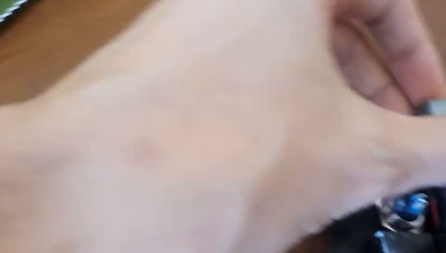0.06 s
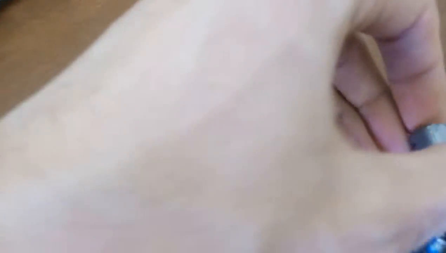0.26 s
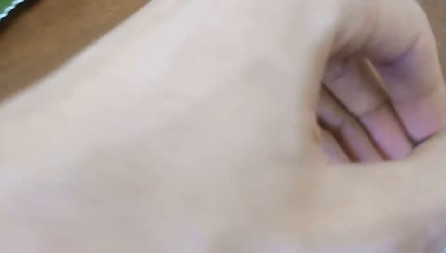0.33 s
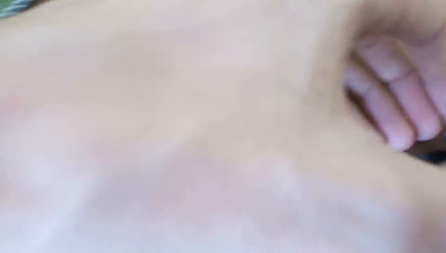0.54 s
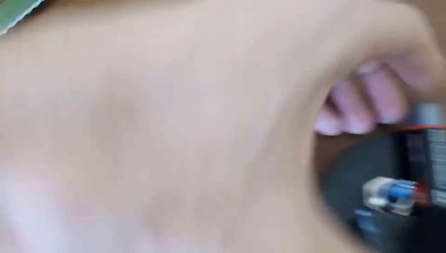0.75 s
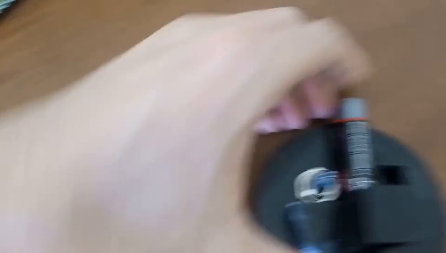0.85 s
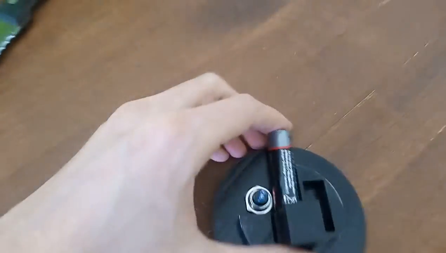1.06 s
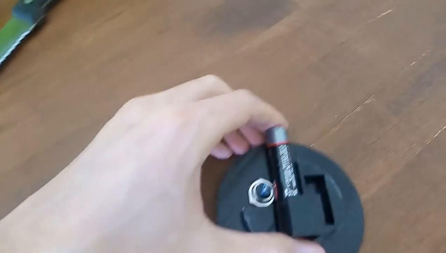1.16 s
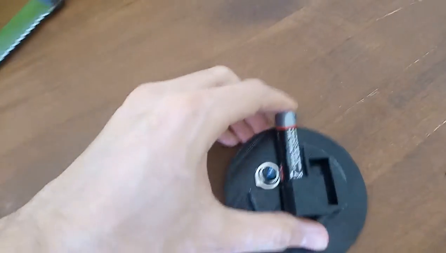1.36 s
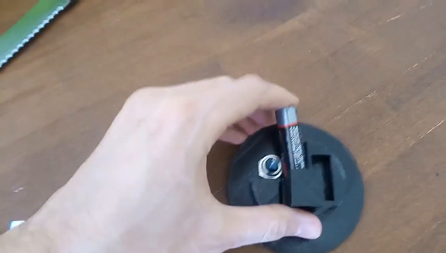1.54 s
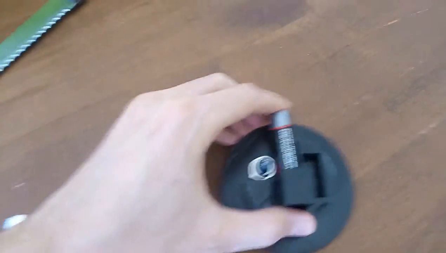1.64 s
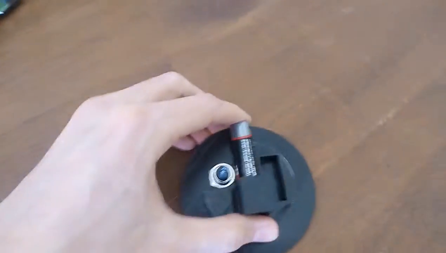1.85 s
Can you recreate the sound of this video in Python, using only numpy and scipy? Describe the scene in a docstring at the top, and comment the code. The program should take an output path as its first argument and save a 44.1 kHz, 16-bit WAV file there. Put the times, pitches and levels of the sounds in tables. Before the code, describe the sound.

Hand brushing a microphone: sharp clicks, one short loud scrape, then faint plastic ticks.

```python
"""Skin brushes a camera's case as a hand reaches past it for a small plastic device on a wooden table.
It catches and lets go in a few sharp snaps, each a pulse through the case, then drags across it
in one short, loud scrape of crowded slips. The plastic rasps and ticks faintly under the fingers
while the hand-held camera rumbles, bumps and settles in a quiet room."""
import sys
import numpy as np
from scipy import signal
from scipy.fft import rfft, irfft, next_fast_len
from scipy.io import wavfile
from scipy.ndimage import uniform_filter1d, minimum_filter1d

SR = 44100
rng = np.random.default_rng(int(sys.argv[2]) if len(sys.argv) > 2 else 0)


def master_out(mix):
    """Clip the mix to full scale and print it as 16-bit PCM to the path in sys.argv[1]."""
    frames = np.transpose(np.atleast_2d(mix))
    ceiling = np.clip(frames, -1, 1)
    pcm = np.round(ceiling * 32767).astype(np.int16)
    wavfile.write(sys.argv[1], SR, pcm)


N = 83790
TOP_HZ = 15500

# Tone of the quiet room. Each row: frequency in Hz, gain in dB.
ROOM_TONE_EQ = [(30, -1), (100, 5.5), (200, -0.5), (300, -4.5), (450, -10.5), (900, -12.5), (2400, -16.5),
                (4500, -18), (6200, -20), (7800, -31), (10000, -32.5), (15000, -37.5)]
# Swell of the light brush on the case. Each row: time in seconds, level in dB.
BRUSH_ENVELOPE = [(0, -49), (.03, -55), (.07, -62), (.085, -46), (.11, -50.5), (.13, -55.5), (.168, -58.5),
                  (.182, -50), (.193, -40.5), (.213, -30), (.235, -56.5), (.27, -53), (.288, -66),
                  (.325, -60)]
# Dull tone of that brush. Each row: frequency in Hz, gain in dB.
BRUSH_EQ = [(30, 0), (150, 4.5), (400, 3), (900, -4.5), (1700, -10.5), (2700, -12.5), (4000, -24.5),
            (6000, -30.5), (8500, -52)]
# Single slips of skin on the case. Each row: start in seconds, peak in dB, treble corner in Hz.
SKIN_SNAPS = [(.0840, -34.5, 1960), (0.1004, -24.5, 1800), (0.102, -49, 6000), (.1118, -25.5, 1280),
              (.1555, -35, 1393), (0.1739, -25, 1800), (0.1862, -27, 2399), (.1890, -32.5, 3186),
              (.2031, -2, 3596), (.2100, -4.5, 3796), (.2150, -6.5, 4957), (0.219, -16, 3000),
              (0.2201, -15, 5000), (0.3475, -6, 997), (.3680, -32, 899.5), (0.3695, -5.5, 1094),
              (0.4733, -42.5, 800), (0.587, -40, 910), (0.6958, -47.5, 702)]
# The case's response to a slip. Each row: frequency in Hz, gain in dB.
CASE_EQ = [(30, -10.5), (90, 4.5), (220, 4.5), (600, 0.5), (1300, -1.5), (2600, -2), (4200, -8.5),
           (6300, -14), (8500, -34), (15000, -46)]
# Swell of fingers sliding on plastic. Each row: time in seconds, level in dB.
SLIDE_ENVELOPE = [(.2, -62), (.212, -34), (.223, -38.5), (.234, -47.5), (.248, -50.5), (.256, -49),
                  (.279, -51.5), (.286, -58), (.302, -57), (.307, -47.5), (.312, -53), (.333, -44.5),
                  (.375, -50), (.4, -61)]
# Thin tone of that slide. Each row: frequency in Hz, gain in dB.
SLIDE_EQ = [(200, -26), (1700, -14), (2250, -4.5), (2650, 4.5), (3150, -8.5), (4100, -2), (4900, -15.5),
            (6200, -27.5), (8500, -53)]
# Small contacts on the plastic. Each row: start in seconds, gain in dB, treble corner in Hz.
PLASTIC_TICKS = [(0.3163, -30, 4202), (0.3886, -37, 4020), (.5886, -38, 3850), (0.5927, -35, 3300),
                 (.6045, -47.5, 3000), (0.7121, -36.5, 2510), (0.7173, -45.5, 2436), (1.5673, -41, 2300),
                 (1.5710, -49, 2300), (1.621, -58.5, 2603)]
# Modes of the plastic shell. Each row: frequency in Hz, gain in dB, seconds to fall by 60 dB.
SHELL_MODES = [(2050, -8.5, .03), (2270, -4.5, .014), (2460, -0.5, .017), (2680, -3.5, 0.022),
               (2950, -5.5, .015), (3500, -6.5, .018), (3850, -8, .016), (5640, -1.5, .022)]
# Force of the dragging skin. Each row: time in seconds, force in dB.
DRAG_FORCE = [(.328, -51.5), (.333, -36), (.341, -38.5), (.346, -25.5), (.351, -15.5), (.355, -11),
              (.367, -10), (.373, -20), (.382, -49), (.396, -48.5), (.412, -59)]
# Tone of the scrape. Each row: frequency in Hz, gain in dB.
DRAG_EQ = [(40, -20.5), (150, -2.5), (320, -1.5), (700, 2), (1100, 1), (1550, -0.5), (2200, -11.5),
           (3300, -20), (6200, -36.5), (8500, -58.5), (15000, -71)]
# Swell of the grip's rumble. Each row: time in seconds, relative level in dB.
RUMBLE_ENVELOPE = [(0.39, -30.5), (0.444, -40), (0.548, -40.5), (0.684, -42), (0.76, -45.5), (0.802, -52.5),
                   (0.906, -57.5), (0.94, -40), (1.008, -55), (1.344, -55), (1.406, -78), (1.454, -57.5),
                   (1.63, -61.5), (1.718, -83), (1.768, -54.5), (1.814, -82), (1.866, -55), (1.9, -55)]
# Deep tone of that rumble. Each row: frequency in Hz, gain in dB.
RUMBLE_EQ = [(15, -31), (28, -9), (50, 2), (110, 0), (170, -10), (260, -21.5), (400, -28.5), (800, -33.5),
             (1500, -52), (4000, -81.5)]
# Soft bumps on the camera. Each row: start in seconds, gain in dB, pitch in Hz.
GRIP_BUMPS = [(.3305, -20, 170), (0.3461, -11.5, 130), (0.3681, -10, 150), (.379, -28, 90.5),
              (0.4031, -22.5, 160), (0.42, -29, 70), (0.51, -31, 50), (0.53, -33, 45), (0.5839, -32, 210),
              (0.747, -38.5, 120), (0.9324, -34.5, 166), (0.957, -43, 65.1), (1.148, -46.5, 129.2),
              (1.174, -50.5, 149), (1.765, -56, 108.7), (1.863, -46.5, 140)]
# Decay of the room. Each row: frequency in Hz, seconds to fall by 60 dB.
ROOM_DECAY = [(100, 0.42), (2200, 0.3), (6000, .2), (12000, .1)]


def amp(db):
    """Decibels to gain."""
    return 10 ** (np.asarray(db) / 20)


def unit(x):
    """Scale to rms 1."""
    return x / np.sqrt(np.mean(x ** 2) + 1e-20)


def decay(t, t60):
    """A fade that falls 60 dB in t60 seconds."""
    return np.exp(-np.log(1000) * t / t60)


def along(points, hz):
    """Read (Hz, value) points on a log frequency axis."""
    freqs, values = np.transpose(points)
    return np.interp(np.log(hz + 1), np.log(freqs + 1), values)


def envelope(rows):
    """Gain per sample of a (seconds, dB) curve, silent outside it."""
    times, db = np.transpose(rows)
    return amp(np.interp(np.arange(N) / SR, times, db, left=-200, right=-200))


def pass_filter(x, kind, hz, order=2):
    """Low-pass or high-pass x."""
    return signal.sosfilt(signal.butter(order, hz, kind, fs=SR, output="sos"), x)


def filtered(x, gain):
    """Apply a gain that depends on frequency."""
    size = next_fast_len(N + SR // 2)
    return irfft(rfft(x, size) * gain(np.fft.rfftfreq(size, 1 / SR)), size)[:N]


def coloured(x, eq):
    """x through an EQ curve, at rms 1."""
    return unit(filtered(x, lambda hz: amp(along(eq, hz))))


def pulse(eq, corner_hz, size=4096):
    """A pulse of peak 1 shaped by an EQ; a softer contact loses the treble above its corner."""
    hz = np.fft.rfftfreq(size, 1 / SR)
    softness = 1 / np.sqrt(1 + (hz / corner_hz) ** 4)
    cepstrum = irfft(np.log(amp(along(eq, hz)) * softness))
    cepstrum[1:size // 2] *= 2  # minimum phase packs the energy into the attack
    cepstrum[size // 2 + 1:] = 0
    wave = irfft(np.exp(rfft(cepstrum)))
    return wave / np.abs(wave).max()


def add(track, start, sound):
    """Mix a sound in at a start in seconds."""
    part = track[max(0, round(start * SR)):][:len(sound)]
    part += sound[:len(part)]


def room_tone():
    """A faint, steady bed of low noise."""
    return amp(-68.5) * coloured(rng.standard_normal(N), ROOM_TONE_EQ)


def skin_rub(swell, eq, grains_per_s):
    """Tiny random catches of skin blur into a rub, coloured by the surface."""
    grains = (rng.random(N) < grains_per_s / SR) * rng.standard_normal(N)
    return envelope(swell) * coloured(grains, eq)


def skin_snaps():
    """Skin catches and lets go; each slip sends one sharp pulse through the case."""
    out = np.zeros(N)
    for start, db, corner_hz in SKIN_SNAPS:
        add(out, start, amp(db) * pulse(CASE_EQ, corner_hz))
    return out


def plastic_ticks(rise_s=.0005):
    """Small contacts crack and briefly ring the plastic shell."""
    out, t = np.zeros(N), np.arange(SR // 10) / SR
    attack = 1 - np.exp(-t / rise_s)
    for start, db, corner_hz in PLASTIC_TICKS:
        ring = np.zeros(len(t))
        for hz, mode_db, t60 in SHELL_MODES:
            strength = amp(mode_db + rng.normal(0, 1.5))
            ring += strength * decay(t, t60) * np.sin(2 * np.pi * (hz * t + rng.random()))
        crack = amp(-4.5) * rng.standard_normal(len(t)) * decay(t, t60=.02)
        tick = (ring + pass_filter(crack, "high", 1600)) * attack
        add(out, start, amp(db) * pass_filter(tick, "low", corner_hz, order=6))
    return out


def skin_drag(slips_per_s=640, scatter=.24, spread_db=1, grit_db=-1.5):
    """Fast, uneven slips push the case both ways, with grit between them: one scrape."""
    jitter, direction, weight = rng.standard_normal((2048, 3)).T
    times = DRAG_FORCE[0][0] + (np.arange(len(jitter)) + scatter * jitter) / slips_per_s
    sizes = np.sign(direction) * amp(-spread_db * weight)
    slips = np.bincount((times * SR).astype(int), sizes, N)[:N]
    slips /= np.sqrt(np.mean(sizes ** 2) * slips_per_s / SR)  # rms 1 while slipping
    grit = amp(grit_db) * rng.standard_normal(N)
    force = envelope(DRAG_FORCE)
    scrape = signal.fftconvolve((slips + grit) * force, pulse(DRAG_EQ, TOP_HZ))[:N]
    return unit(scrape) * np.sqrt(np.mean(force ** 2))


def camera_handling(rumble_db=-1, bump_cycles=3.95, rise_s=.0008):
    """The grip on the camera rumbles, with soft bumps that die within a few cycles."""
    out = amp(rumble_db) * envelope(RUMBLE_ENVELOPE) * coloured(rng.standard_normal(N), RUMBLE_EQ)
    t = np.arange(SR // 5) / SR
    attack = 1 - np.exp(-t / rise_s)
    for start, db, hz in GRIP_BUMPS:
        bump = np.sin(2 * np.pi * hz * t) * decay(t, bump_cycles / hz) * attack
        add(out, start, 2 * amp(db) * bump)
    return pass_filter(out, "low", 1200)


def reverb(x):
    """The room's short tail; the treble dies first."""
    hz, t, noise = signal.stft(rng.standard_normal(SR // 2), SR, nperseg=256)
    fade = decay(t, along(ROOM_DECAY, hz)[:, None])
    tail = signal.istft(noise * fade, SR, nperseg=256)[1]
    return signal.fftconvolve(x, tail / np.linalg.norm(tail))[:N]


def scene():
    """The skin sounds are close and almost dry; the ticks carry some room."""
    skin = skin_snaps() + skin_drag()
    skin += skin_rub(BRUSH_ENVELOPE, BRUSH_EQ, grains_per_s=4500)  # dull brush on the case
    skin += skin_rub(SLIDE_ENVELOPE, SLIDE_EQ, grains_per_s=2400)  # thin rasp on the plastic
    ticks = plastic_ticks()
    room = room_tone() + amp(-48) * reverb(skin) + amp(-13) * reverb(ticks)
    return (skin + ticks + room + camera_handling())[None]


def record(dry):
    """The camera cuts the deepest bass, limits the peaks and drops the highest treble."""
    ceiling, window = amp(-1.5), int(.002 * SR)
    x = pass_filter(dry[0], "high", 32)
    gain = np.minimum(1, ceiling / (np.abs(x) + 1e-9))
    held = minimum_filter1d(gain, 2 * window)
    smoothed = uniform_filter1d(uniform_filter1d(held, window), window)
    return filtered(x * smoothed, lambda hz: hz < TOP_HZ)[None]


dry = scene()
out = record(dry)
master_out(out)
```